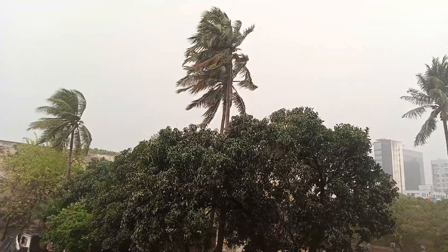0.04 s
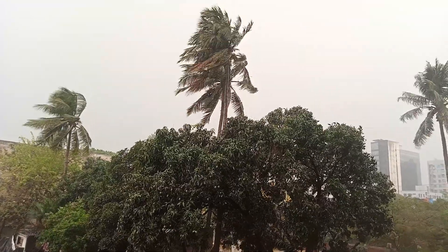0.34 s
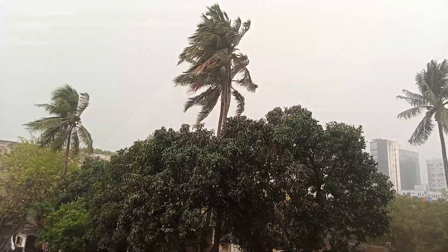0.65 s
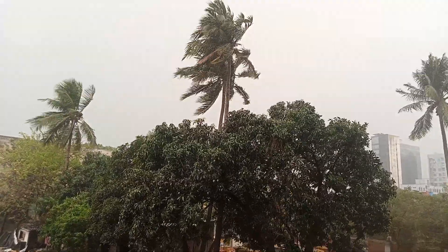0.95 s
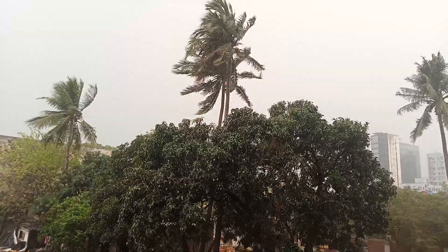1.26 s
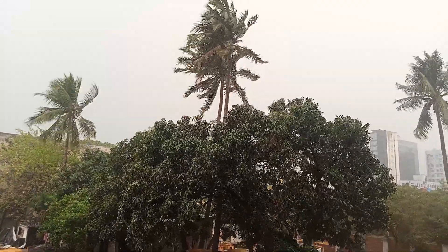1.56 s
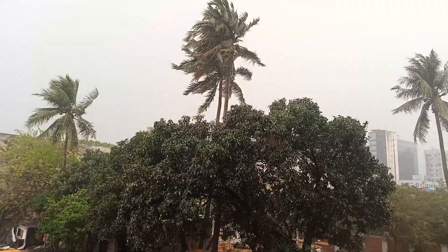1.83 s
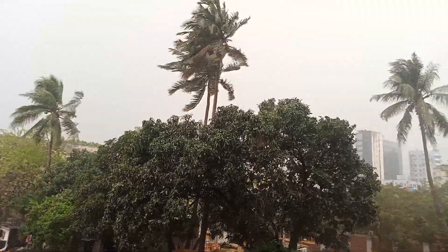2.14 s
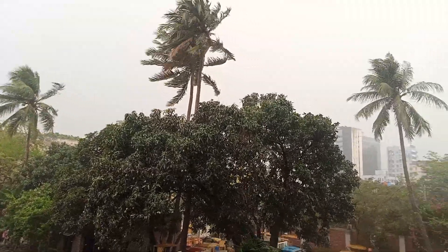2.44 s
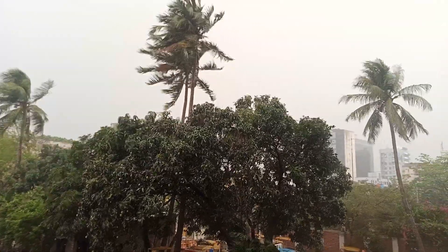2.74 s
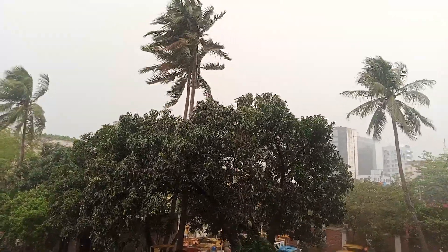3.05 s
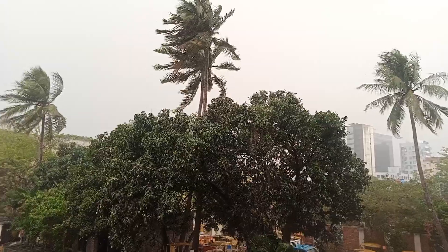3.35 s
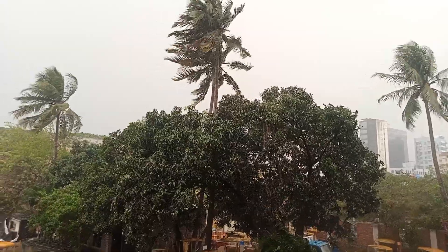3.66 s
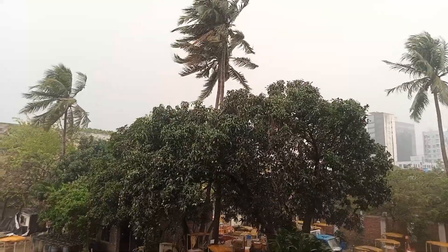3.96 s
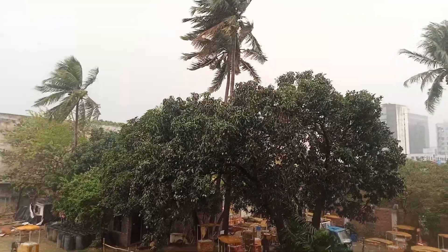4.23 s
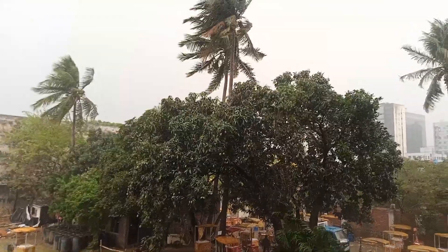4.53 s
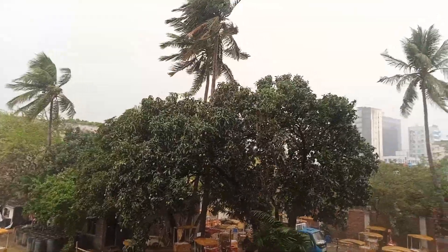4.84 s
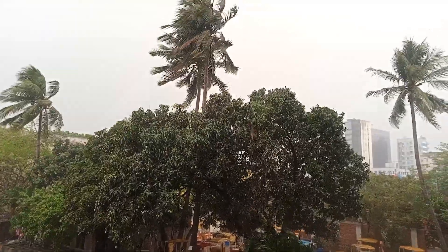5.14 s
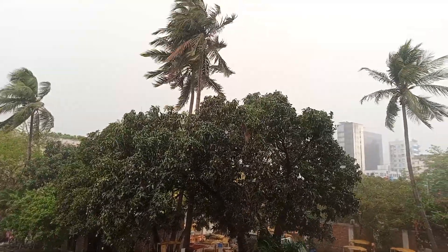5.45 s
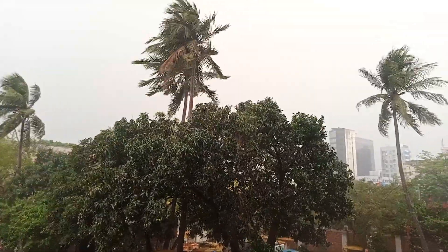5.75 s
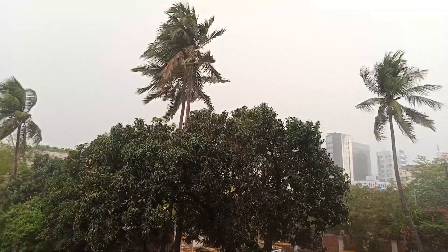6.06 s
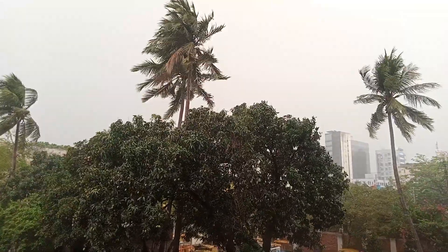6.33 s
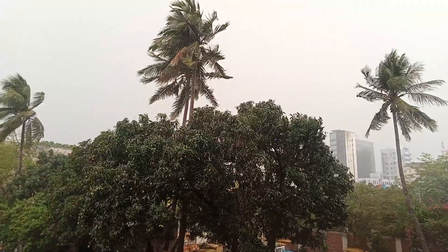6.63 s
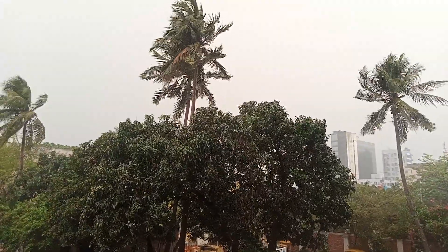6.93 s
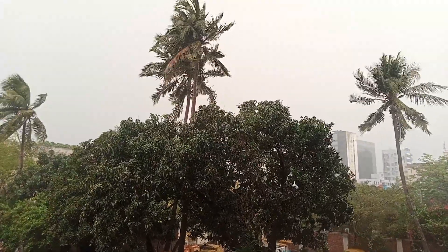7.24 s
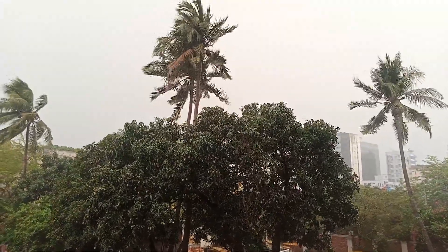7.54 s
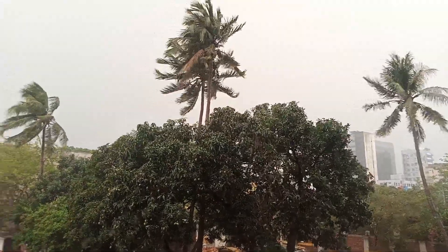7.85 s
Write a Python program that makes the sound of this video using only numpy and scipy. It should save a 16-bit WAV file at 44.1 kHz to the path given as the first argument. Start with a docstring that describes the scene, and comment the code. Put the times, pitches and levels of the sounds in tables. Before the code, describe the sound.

Strong gusting wind buffets the microphone with low thumps and crackles, then eases as tree leaves and palm fronds rush and hiss.

```python
"""Storm wind in trees

Wind blows through a big broad-leaved tree and tall palms, whose leaves touch and rub in rushing waves.
In front, turbulence buffets the microphone: large eddies thump on the port, smaller ones flap, single
vortices slap, and the hardest gusts tear into a crackle. As it eases, a surge of foliage takes over."""
import sys
import numpy as np
from scipy import signal
from scipy.fft import rfft, irfft, next_fast_len
from scipy.io import wavfile
from scipy.ndimage import uniform_filter1d, minimum_filter1d

SR = 44100
rng = np.random.default_rng(int(sys.argv[2]) if len(sys.argv) > 2 else 0)


def wav_out(sig):
    """Save sig, one row per channel (or a flat mono array), as 16-bit PCM at SR to the path in sys.argv[1]."""
    wavfile.write(sys.argv[1], SR, np.round(np.clip(np.atleast_2d(sig).T, -1, 1) * 32767).astype(np.int16))


N = 347949

# Relative spectral densities of all crowns, palm fronds and leaf edges: frequency_hz, level_db
RUSH_SPECTRUM = [(300, -2), (700, -5), (1100, -3.5), (1500, -2), (1820, 1.5), (2150, 0), (2500, -1),
                 (2880, -1), (3250, -5), (3900, -6.5), (4700, -15.5), (6000, -34)]
HISS_SPECTRUM = [(3000, 2), (3700, -2.5), (4150, 1), (4600, -0.5), (5200, -1.5), (5650, -1.5), (6200, -5.5),
                 (7000, -18), (8000, -32.5), (10500, -26.5), (12200, -24.5), (13350, -18.5), (14300, -25),
                 (15500, -37)]
SIZZLE_SPECTRUM = [(5000, -20), (6300, -1.5), (7100, 1.5), (7700, -4), (8500, -6.5), (9500, -11.5),
                   (11000, -15), (12500, -13), (13600, -8.5), (14400, -10.5), (15500, -13)]
# Wind in the near broad-leaved tree and in the palms behind it: time_s, strength_db
TREE_WIND = [(0.0, -42.5), (0.75, -40), (0.92, -44.5), (2.1, -48), (3.0, -47), (3.55, -45), (3.82, -39),
             (3.92, -43.5), (4.44, -49), (4.52, -51), (4.8, -55), (4.9, -46), (5.2, -56.5), (5.29, -47.5),
             (5.85, -45), (6.05, -50.5), (7.89, -47.5)]
PALM_WIND = [(0.0, -53.5), (0.6, -48), (1.5, -55), (3.1, -56), (3.55, -51.5), (3.87, -45.5), (4.05, -43.5),
             (4.13, -49), (4.75, -54.5), (4.9, -50), (5.13, -48), (5.42, -39.5), (6.15, -40.5),
             (7.22, -39.5), (7.55, -41.5), (7.89, -40)]
# Relative spectral densities of the eddies, from largest to finest: frequency_hz, level_db
SWELL_SPECTRUM = [(30, -20), (45, -3), (62, -1), (85, 2), (130, -15)]
THUMP_SPECTRUM = [(25, -39.5), (40, -18.5), (60, -6), (85, 0), (115, 1), (165, -2.5), (230, -9),
                  (320, -19.5), (500, -52)]
FLAP_SPECTRUM = [(130, -20), (200, 1.5), (290, 0), (370, -4), (460, -7.5), (560, -10.5), (720, -20),
                 (1000, -37.5), (2000, -36.5)]
TEAR_SPECTRUM = [(380, -25), (480, 8), (620, 7.5), (850, 3.5), (1050, -1), (1300, -11.5), (1700, -16.5),
                 (2200, -27.5), (3000, -39.5), (4500, -49)]
SPUTTER_SPECTRUM = [(900, -2.5), (1400, -1), (1900, -2.5), (2400, -5.5), (3100, -19), (4500, -32)]
# Wind over the port, where roughness favours the smaller eddies: time_s, strength_db, roughness_db
PORT_WIND = [(0.0, -22, 1), (0.23, -27, -5.5), (0.43, -25.5, 0), (0.75, -24.5, 1), (1.31, -20.5, 1.5),
             (1.48, -24.5, -1), (1.73, -22, 1.5), (2.31, -24, -2.5), (2.84, -23.5, 1), (3.19, -28, -4.5),
             (3.82, -29, 0), (4.25, -21.5, -4.5), (4.75, -27, -0.5), (5.07, -31.5, -6), (5.72, -35, -4.5),
             (6.14, -30, -4), (6.6, -35, -3), (7.89, -37.5, -3)]
# Gusts on top of that wind: start_s, length_s, strength_db, roughness_db
GUSTS = [(0.08, 0.082, -29, -7), (0.182, 0.027, -21.5, 4), (0.279, 0.013, -27.5, 16.5),
         (0.324, 0.047, -37, -6), (0.762, 0.048, -20, -1.5), (0.811, 0.12, -19, 3.5),
         (0.968, 0.027, -23, 5), (1.102, 0.017, -23, 13), (1.209, 0.054, -19, 4.5), (1.273, 0.15, -19, 5),
         (1.522, 0.034, -30, -18), (1.706, 0.018, -23.5, -2), (1.825, 0.18, -19, 3), (1.942, 0.035, -13, 5),
         (2.036, 0.065, -21, -6), (2.214, 0.057, -28, 12), (2.39, 0.11, -26, 3.5),
         (2.541, 0.045, -31.5, -17), (2.632, 0.029, -26, 13), (2.694, 0.14, -26, 6.5), (3, 0.037, -23.5, 5),
         (3.279, 0.084, -21.5, -0.5), (3.47, 0.018, -31.5, -11.5), (3.634, 0.028, -21, -2),
         (3.836, 0.12, -28.5, -3.5), (3.892, 0.039, -27.5, -12), (3.965, 0.038, -18.5, -1),
         (4.063, 0.061, -23.5, -5), (4.23, 0.026, -17, -5), (4.37, 0.12, -24.5, -2),
         (4.591, 0.14, -23.5, -2), (4.766, 0.02, -22, -3), (4.853, 0.015, -20.5, 1.5),
         (4.949, 0.05, -23, -5), (5.052, 0.13, -30.5, -6.5), (5.426, 0.042, -20.5, 0.5),
         (5.547, 0.029, -25.5, -7), (5.735, 0.014, -23.5, 2.5), (5.911, 0.17, -24, -2),
         (6.354, 0.076, -23.5, -1), (6.926, 0.03, -25.5, -1), (7.46, 0.067, -27, -4.5),
         (7.556, 0.092, -34.5, -10.5)]
# Stalls of the flow: start_s, length_s
STALLS = [(0.152, 0.02), (0.992, 0.045), (2.308, 0.047), (2.614, 0.045), (3.184, 0.039), (3.732, 0.1),
          (3.96, 0.048), (4.28, 0.04), (4.795, 0.082), (5.221, 0.034), (5.344, 0.047), (5.575, 0.067),
          (6.227, 0.051), (7.73, 0.1)]
# Change of eddy strength in a stall: thump_db, flap_db, tear_db
STALL_DB = [-6.5, -5.5, -6.5]
# Eddy strength at saturation: thump_db, flap_db, tear_db
SATURATION_DB = [-4.5, -10, -12]
# Single vortices striking the port, with relative levels: time_s, body_db, core_db
VORTICES = [(0.362, -13, -24), (1.101, -16, -20), (1.28, -4, -15), (1.855, -27, -22), (2.642, -18, -16.5),
            (2.663, -22, -22), (4.109, -2, -27), (4.611, 11, -36), (4.945, -12, -39), (5.054, 8.5, -43),
            (5.091, 4, -47), (5.328, 2.5, -50)]


def from_db(db):
    """Amplitude grows tenfold with every 20 decibels."""
    return 10 ** (np.asarray(db) / 20)


def unit_power(x):
    """Division by the root mean square gives a signal unit power."""
    return x / np.sqrt(np.mean(x ** 2) + 1e-20)


def curves(rows):
    """Linear interpolation gives each column of a timed table a value at every sample."""
    times_s, *columns = np.transpose(rows)
    return [np.interp(np.arange(N) / SR, times_s, column) for column in columns]


def drift(rate_hz):
    """Low-pass filtered noise wanders slowly, with a spread of about one."""
    step, settling = 20, 4000
    pole = np.exp(-2 * np.pi * step * rate_hz / SR)
    noise = rng.standard_normal(N // step + settling + 2)
    slow = signal.lfilter([1], [1, -2 * pole, pole * pole], noise)[settling:]
    return np.interp(np.arange(N) / step, np.arange(len(slow)), unit_power(slow))


def coloured(x, spectrum):
    """Filtering multiplies spectra; the gain falls 24 dB an octave past the table's ends. Unit power."""
    size = next_fast_len(N)
    octave = np.log2(np.maximum(np.arange(size // 2 + 1) * SR / size, 1))
    hz, level_db = np.transpose(spectrum)
    beyond = np.abs(octave - np.clip(octave, np.log2(hz[0]), np.log2(hz[-1])))
    gain = from_db(np.interp(octave, np.log2(hz), level_db) - 24 * beyond)
    return unit_power(irfft(rfft(x, size) * gain, size)[:N])


def evened(x, span_s):
    """Division by the running envelope steadies the power and keeps the faster fluctuations."""
    width = max(int(span_s * SR), 2)
    power = uniform_filter1d(uniform_filter1d(x ** 2, width), width)
    return x / np.sqrt(np.maximum(power, 0) + 1e-9)


def shot_noise(per_s, spread_db):
    """A Poisson process: independent clicks of random size and sign."""
    sizes = from_db(spread_db * np.minimum(rng.exponential(1, N), 5))
    return unit_power((rng.random(N) < per_s / SR) * sizes * rng.choice([-1, 1], N))


def leaves(spectrum, per_s, spread_db, swish_db):
    """Impact and friction of countless leaves; each clump has its own band and swells as it sways."""
    touches = coloured(shot_noise(per_s, spread_db) + rng.standard_normal(N), spectrum)
    size = next_fast_len(N)
    whole, rustle = rfft(touches, size), 0
    edges_hz = np.geomspace(1200, 7000, num=11)
    clump = np.searchsorted(edges_hz, np.arange(len(whole)) * SR / size)
    for k in range(clump.max() + 1):
        band = irfft(whole * (clump == k), size)[:N]
        rustle = rustle + band * from_db(swish_db * drift(rate_hz=8.3))
    return unit_power(rustle)


def foliage():
    """Incoherent sources add in power: all crowns rush, palm fronds hiss, near leaf edges sizzle."""
    tree, palms = from_db(curves(TREE_WIND) + curves(PALM_WIND))
    crowns = np.hypot(tree, palms)
    rush = crowns * from_db(6.5) * leaves(RUSH_SPECTRUM, per_s=9000, spread_db=2.0, swish_db=1.57)
    hiss = palms * from_db(-0.5) * leaves(HISS_SPECTRUM, per_s=3200, spread_db=4.0, swish_db=1.5)
    sizzle = tree * from_db(-11.5) * leaves(SIZZLE_SPECTRUM, per_s=700, spread_db=2.4, swish_db=0.9)
    return rush + hiss + sizzle


def suction_dip(t, half_width_s):
    """Pressure falls towards the centre of a passing vortex."""
    return -1 / (1 + (t / half_width_s) ** 2)


def vortex_slaps(body_s, core_s, body_gain_db, core_gain_db, port_hz):
    """A vortex is a broad pressure dip with a sharp core; the port, a high-pass, makes it swing back."""
    pressure = np.zeros(N)
    t = np.arange(-SR // 50, SR // 50) / SR - 0.002
    for time_s, body_db, core_db in VORTICES:
        body = from_db(body_db + body_gain_db) * suction_dip(t, body_s)
        core = from_db(core_db + core_gain_db) * suction_dip(t, core_s)
        start = int(time_s * SR) - len(t) // 2
        pressure[start:start + len(t)] += body + core
    rounded = signal.sosfilt(signal.butter(4, 2400, fs=SR, output="sos"), pressure)
    return signal.sosfilt(signal.butter(2, port_hz, "high", fs=SR, output="sos"), rounded)


def plateau(start_s, length_s, rise_s=0.005, fall_s=0.012):
    """A trapezoidal envelope arrives abruptly, holds and lets go; returns its samples and shape."""
    end_s = start_s + length_s
    at = np.arange(max(int((start_s - rise_s) * SR), 0), min(int((end_s + fall_s) * SR), N))
    rise, fall = (at / SR - start_s) / rise_s, (end_s - at / SR) / fall_s
    return at, np.clip(np.minimum(rise, fall) + 0.5, 0, 1)


def cascade(strength_db, roughness_db, middling_db=-28):
    """The energy cascade: rough flow shifts power from the thumping eddies to the tearing ones."""
    large_db = middling_db + 0.92 * (strength_db - middling_db)  # large eddies vary less than the flow
    thump_db = large_db + 8 - roughness_db
    flap_db = strength_db - 0.1
    tear_db = strength_db - 12 + roughness_db
    return from_db([thump_db, flap_db, tear_db]) ** 2


def saturated(power):
    """Saturation flattens the hardest gusts into a sustained roar."""
    full_power = from_db(SATURATION_DB)[:, None] ** 2
    return power / np.hypot(1, power / full_power)


def eddy_amplitudes(wander_hz=9, fitful_below_db=-30, sag_db_per_s=14.5):
    """Wind and gusts add in power to drive thump, flap and tear; a stall weakens all three."""
    wind_db, wind_roughness_db = curves(PORT_WIND)
    # The eddies swell and fade at random, partly together; a light wind is more fitful.
    wander_db = 2 + 0.0627 * np.maximum(fitful_below_db - wind_db, 0)
    shared = drift(wander_hz)
    separate = np.array([drift(wander_hz) for _ in range(3)])
    power = cascade(wind_db, wind_roughness_db) * from_db(wander_db * (shared + separate)) ** 2
    for start_s, length_s, strength_db, roughness_db in GUSTS:
        at, shape = plateau(start_s, length_s)
        sag = from_db(-sag_db_per_s * (at / SR - start_s))  # a gust is strongest as it arrives
        power[:, at] += np.outer(cascade(strength_db, roughness_db), (shape * sag) ** 2)
    stalled = np.zeros(N)
    for start_s, length_s in STALLS:
        at, shape = plateau(start_s, length_s)
        stalled[at] += shape
    return np.sqrt(saturated(power)) * from_db(np.outer(STALL_DB, stalled))


def buffeting():
    """Intermittency: large eddies break up, so flaps and crackle come in bursts and on suction peaks."""
    thump_gain, flap_gain, tear_gain = eddy_amplitudes()
    bursts = drift(rate_hz=30)
    thump = evened(coloured(rng.standard_normal(N), THUMP_SPECTRUM), span_s=0.067)
    suction = np.clip(-thump, -2, 2)
    flutter = rng.standard_normal(N) * from_db(2.0 * bursts + 2.27 * suction)
    crackle = shot_noise(per_s=650, spread_db=-2.0) * from_db(2.0 * bursts + 2.2 * suction)
    flap = evened(coloured(flutter, FLAP_SPECTRUM), span_s=0.029)
    tear = evened(coloured(crackle, TEAR_SPECTRUM), span_s=0.047)
    swell = evened(coloured(rng.standard_normal(N), SWELL_SPECTRUM), span_s=0.25)
    sputter = evened(coloured(crackle, SPUTTER_SPECTRUM), span_s=0.13)
    pressure = (swell * thump_gain ** 0.5 * from_db(-20.5)  # persists in slow air
                + thump * thump_gain * from_db(-0.57)
                + flap * flap_gain * from_db(1.0)
                + tear * tear_gain * from_db(0.1)
                + sputter * tear_gain ** 1.723 * from_db(12))  # emerges in the hardest gusts
    leak = signal.butter(2, 35, "high", fs=SR, output="sos")  # the port leaks the slowest swings away
    return signal.sosfilt(leak, pressure * from_db(1.55 * bursts))


def scene():
    """Superposition: the wind on the port and the sound of the trees sum in one channel."""
    slaps = vortex_slaps(body_s=0.00065, core_s=0.00014, body_gain_db=-6, core_gain_db=17, port_hz=91)
    return (buffeting() + slaps + foliage())[None, :]


def limiter(x, ceiling, hold_s):
    """Peak limiting: the gain dips smoothly around every peak that would pass the ceiling."""
    width = max(int(hold_s * SR), 2)
    needed_gain = np.minimum(1, ceiling / (np.abs(x) + 1e-9))
    return x * uniform_filter1d(minimum_filter1d(needed_gain, width), width)


def record(dry):
    """Finite headroom and bandwidth: peaks are limited and a steep low-pass cuts the highest treble."""
    cutoff_hz = 15500
    limited = limiter(dry, ceiling=1.0, hold_s=0.005)
    return signal.sosfilt(signal.ellip(12, 0.2, 90, cutoff_hz, fs=SR, output="sos"), limited)


dry = scene()
out = record(dry)
wav_out(out)
```